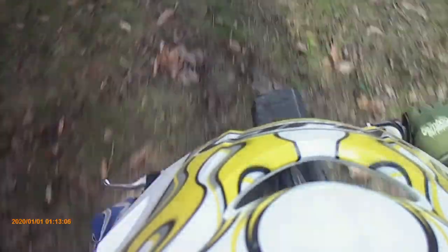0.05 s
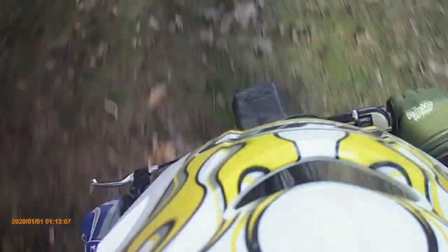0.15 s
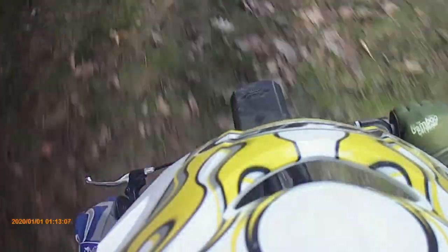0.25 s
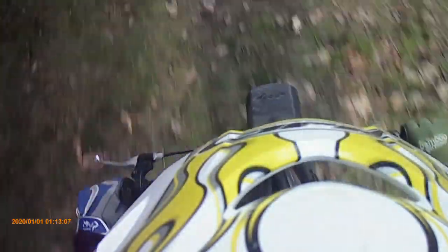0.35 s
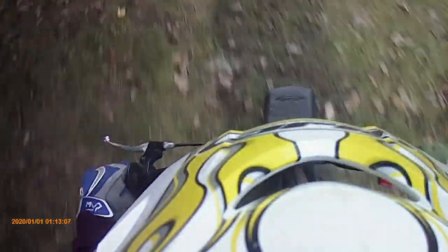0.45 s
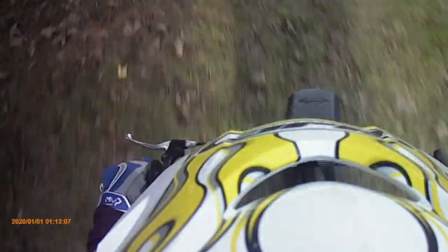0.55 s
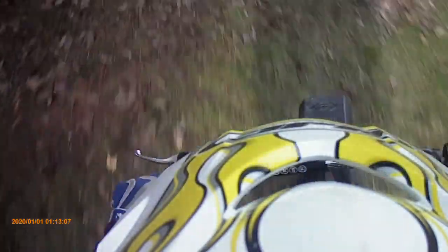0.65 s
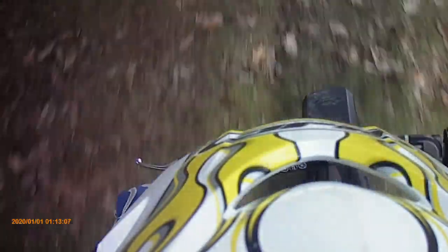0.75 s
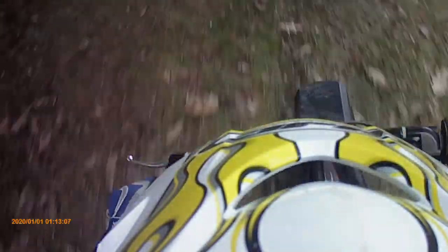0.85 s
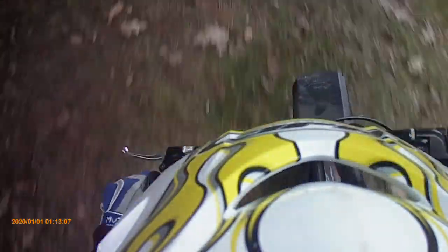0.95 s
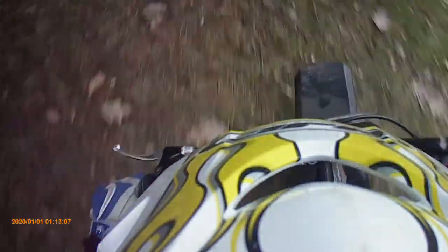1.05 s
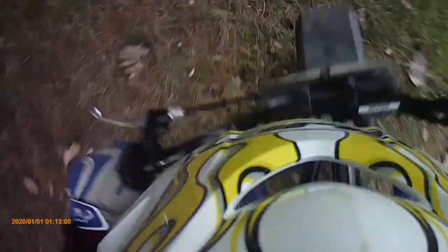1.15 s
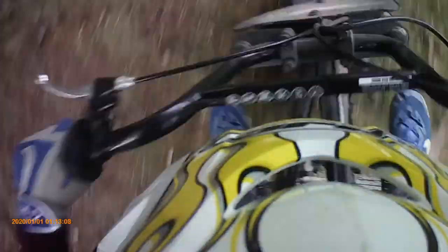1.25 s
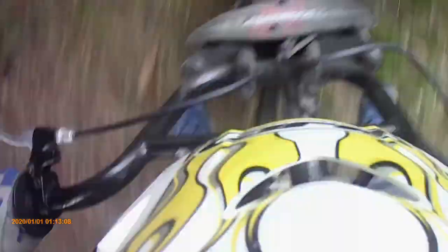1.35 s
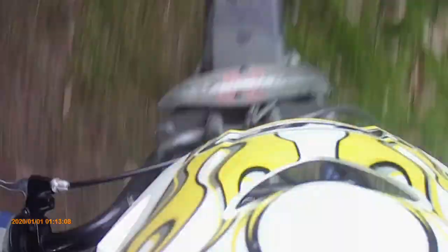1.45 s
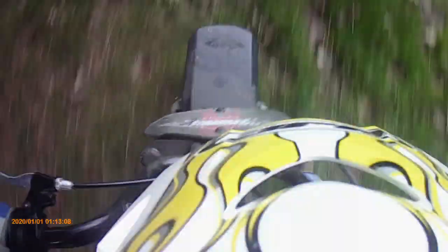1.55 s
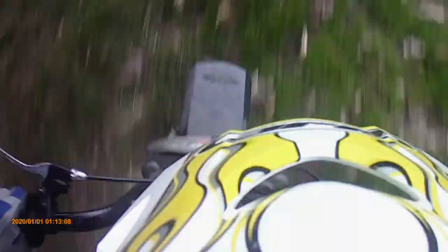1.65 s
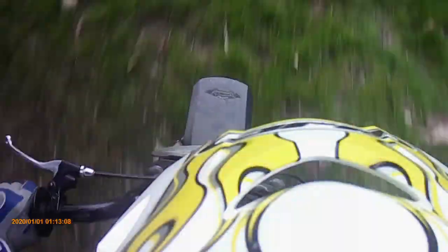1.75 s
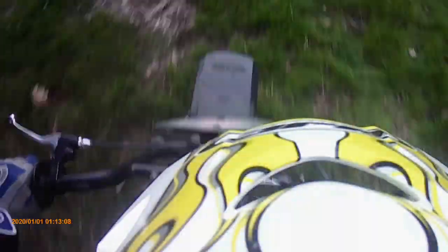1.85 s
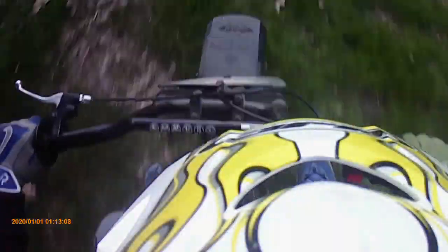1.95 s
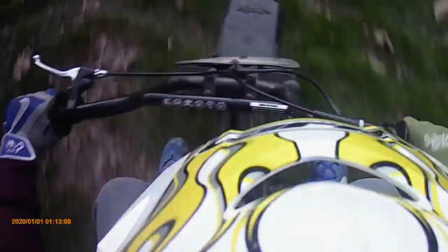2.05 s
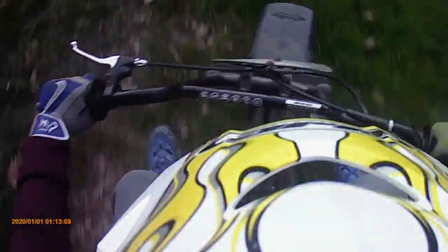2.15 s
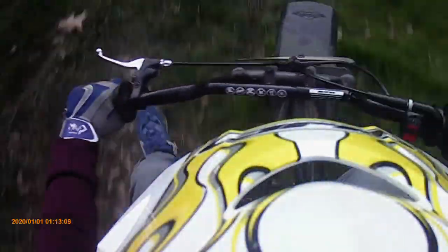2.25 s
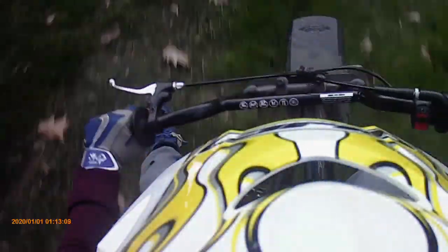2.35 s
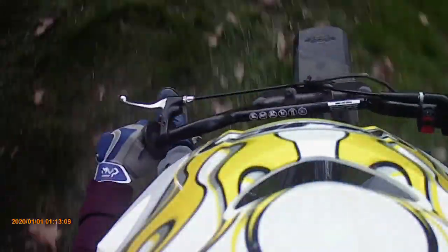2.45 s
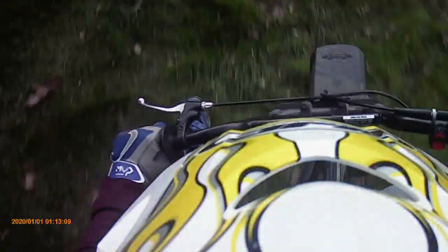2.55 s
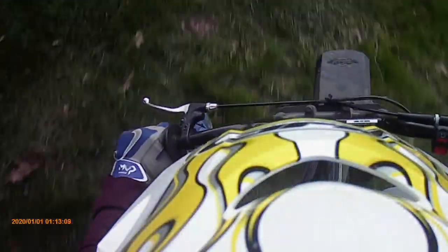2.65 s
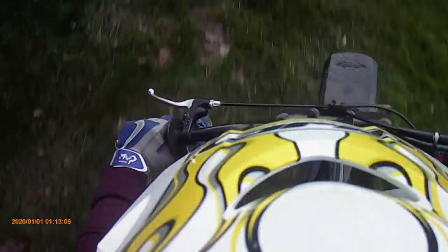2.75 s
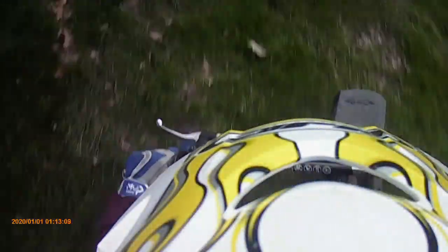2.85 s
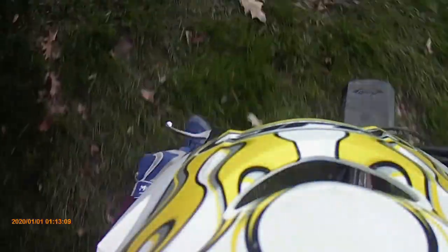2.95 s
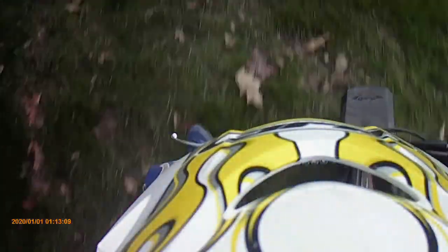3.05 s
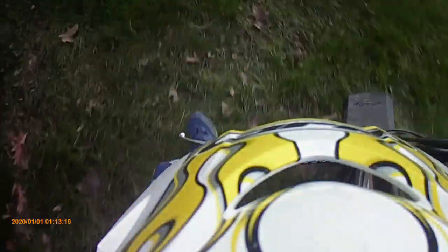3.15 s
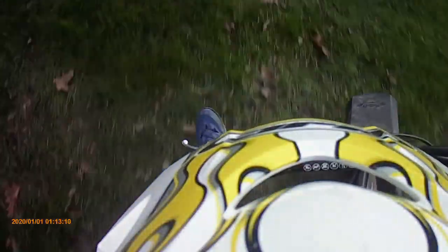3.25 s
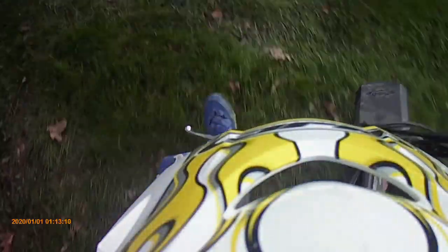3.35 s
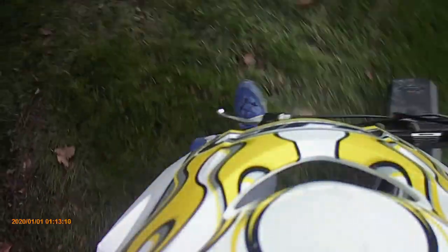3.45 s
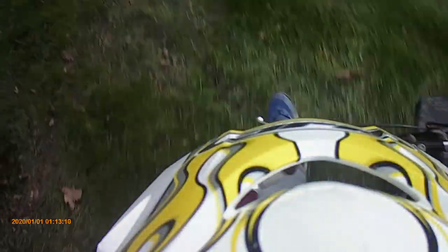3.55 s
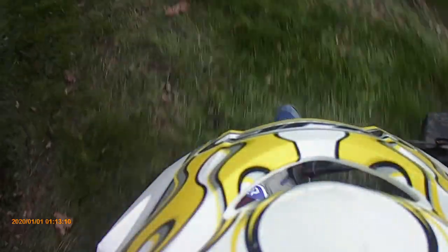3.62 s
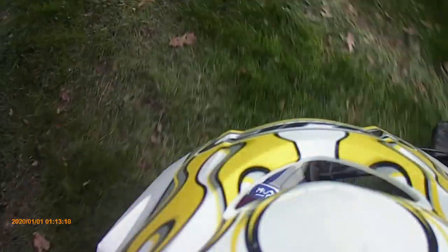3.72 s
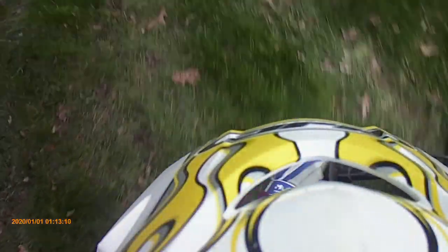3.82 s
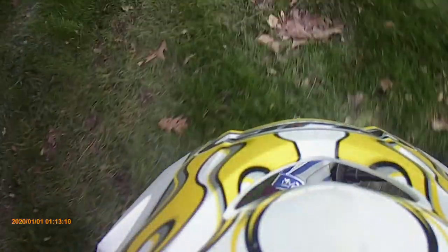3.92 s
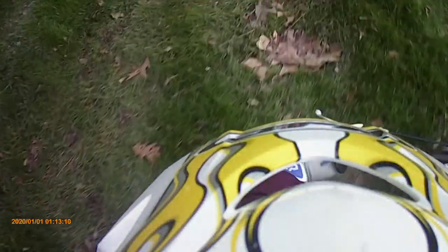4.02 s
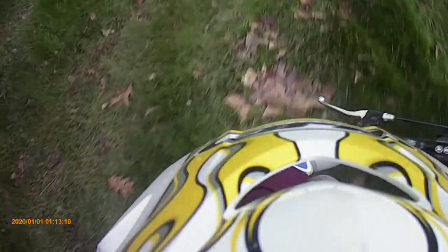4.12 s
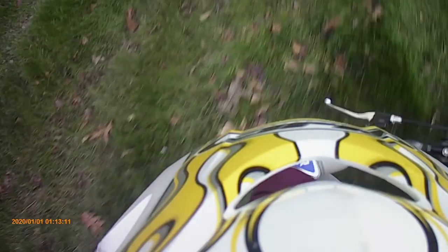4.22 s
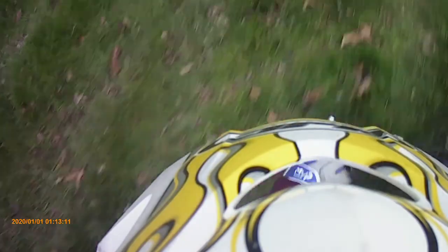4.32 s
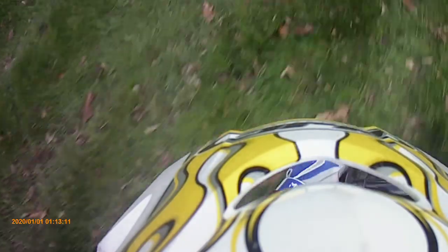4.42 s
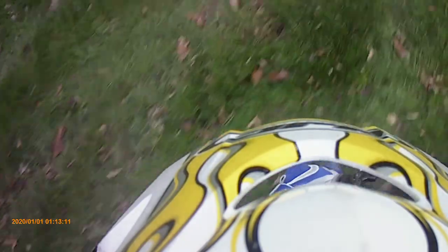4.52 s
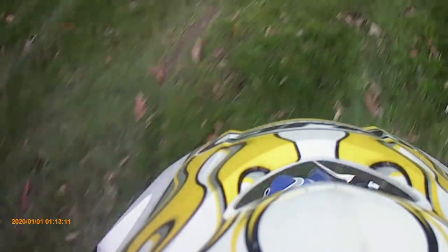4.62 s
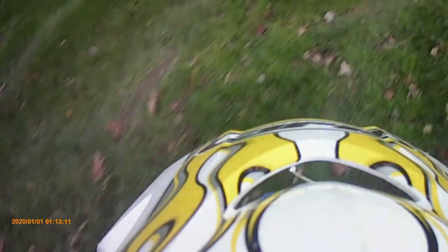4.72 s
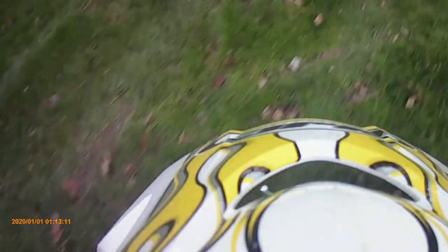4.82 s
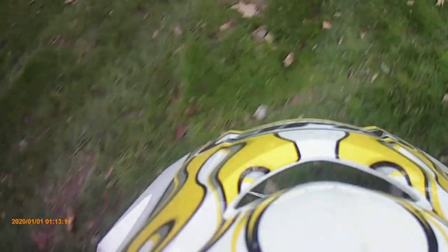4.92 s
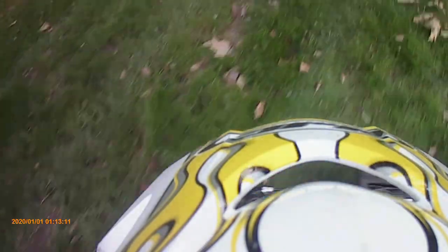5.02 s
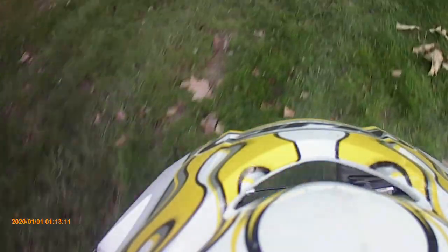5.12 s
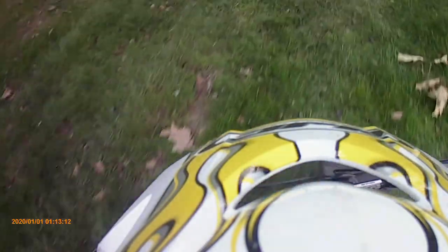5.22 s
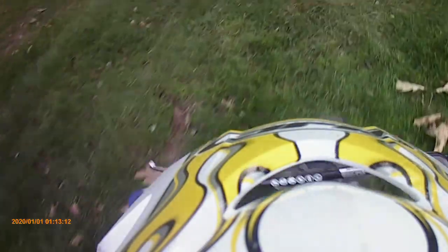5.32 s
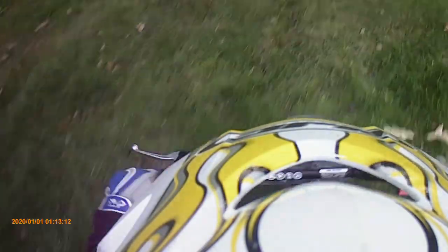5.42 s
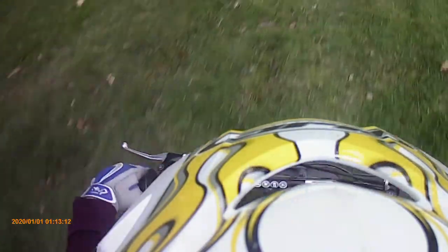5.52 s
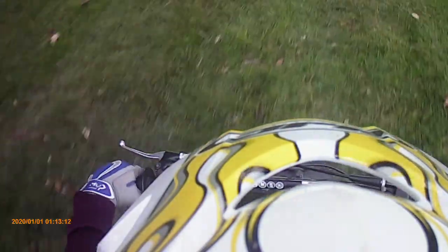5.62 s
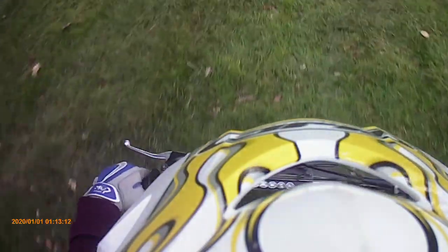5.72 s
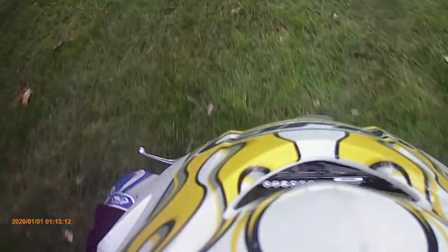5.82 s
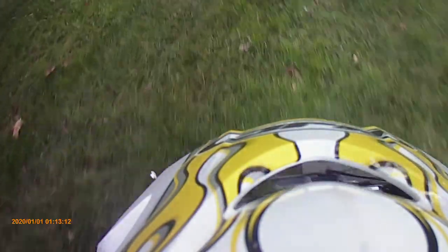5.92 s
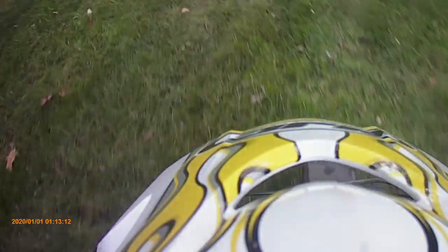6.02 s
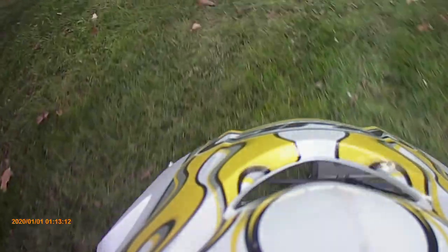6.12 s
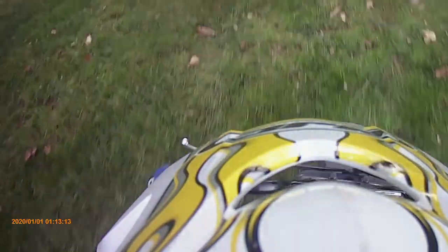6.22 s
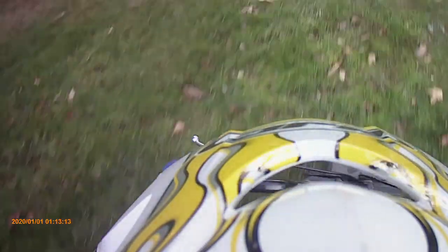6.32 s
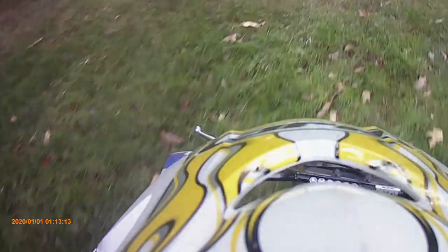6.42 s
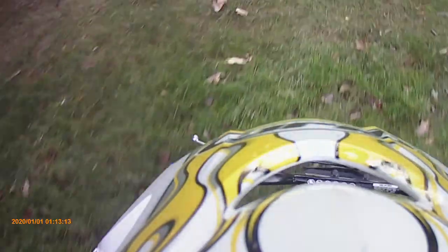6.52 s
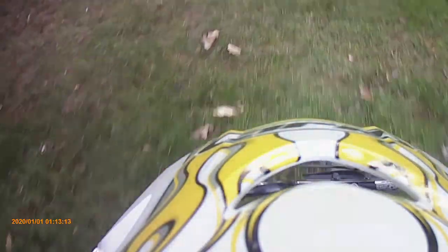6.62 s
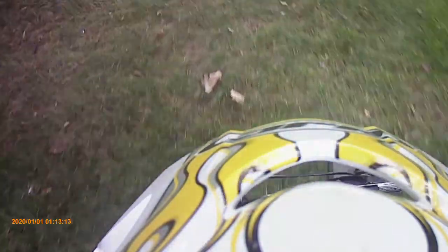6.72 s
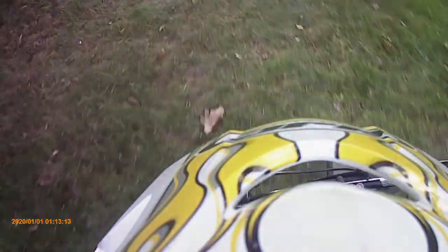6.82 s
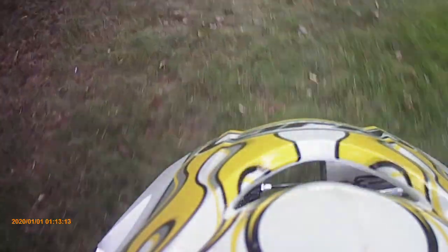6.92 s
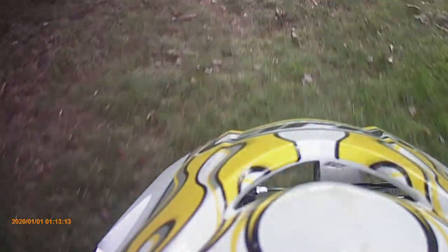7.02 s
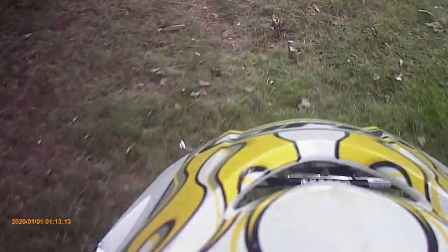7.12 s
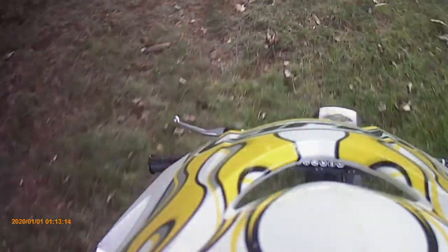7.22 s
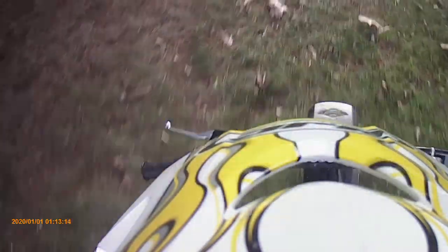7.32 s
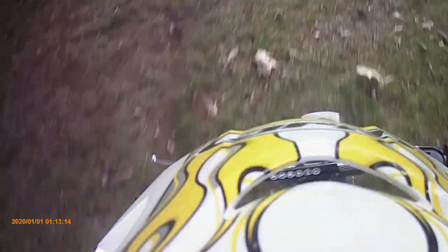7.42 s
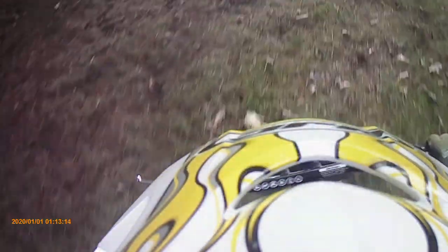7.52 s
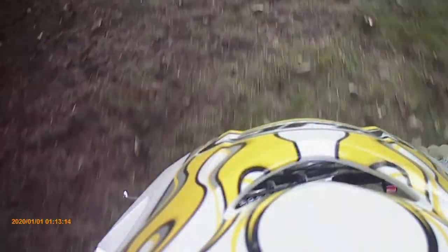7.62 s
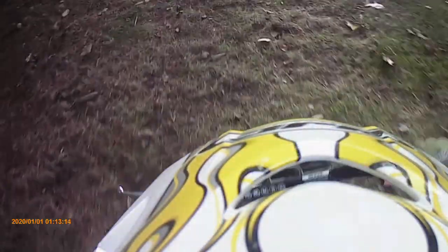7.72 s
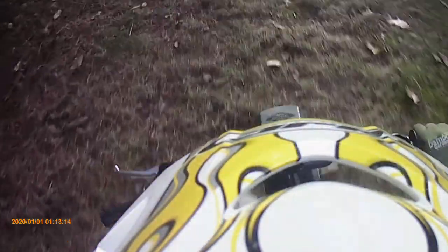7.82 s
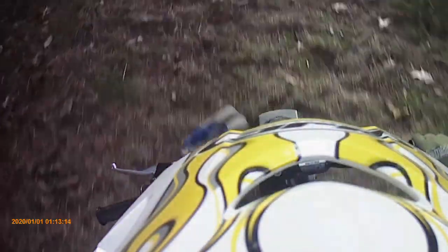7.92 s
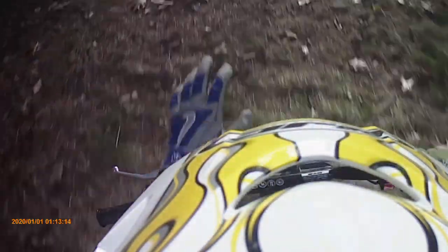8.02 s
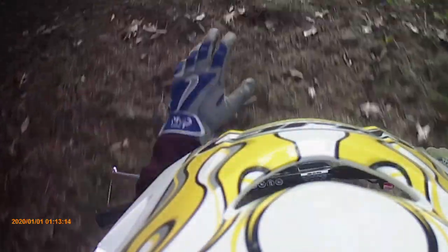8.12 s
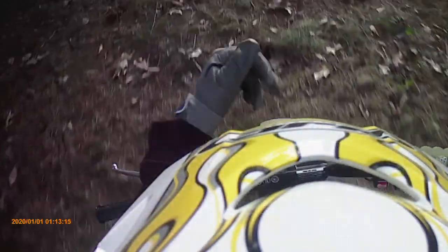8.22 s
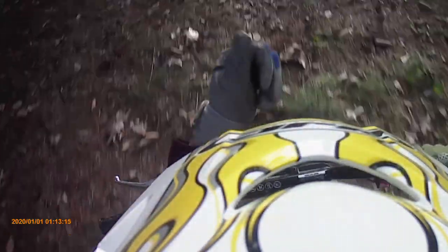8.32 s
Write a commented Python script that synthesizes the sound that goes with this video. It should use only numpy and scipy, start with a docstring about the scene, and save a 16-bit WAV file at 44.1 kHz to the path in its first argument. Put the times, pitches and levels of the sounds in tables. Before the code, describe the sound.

From 0 s a small four-stroke single-cylinder engine runs under load, about twenty uneven firings per second: short metallic cracks around 1.4 to 2 kHz, continuous chain and clutch rattle, hollow exhaust pops and intake tone. Low wind rumble and thin steady hiss lie beneath. The firing grows harder after 1 s. At about 1.28 to 1.38 s a very loud burst of blows, gritty scraping and a tiny squeal hits the plastic camera case, clipping harshly, with a low bounce. Strong knocking continues until about 2.1 s, when the throttle closes; firing fades, pulses slow to about thirteen per second, leaving soft rattle and tappet ticks. Around 3.15 s it reopens, quickens with a brief rattly surge near 3.4 s, then settles into a steady, somewhat quieter chug until 8.4 s. A faint soft jolt falls near 7.7 s. The sound is close, boxy, thin in bass and mono.

```python
"""Over grass, on the move: a small four-stroke single-cylinder bike, heard by a camera in a plastic helmet case.
Each firing sets off resonant noise bursts and rings the engine block; chain and clutch rattle is resonant noise.
Puffs ring the exhaust and intake, tappets tick, and wind and hiss lie beneath; the throttle closes once and reopens.
Jolts bounce the mount; blows, a scrape and a squeal ring the case hard enough to overload the microphone."""
import sys
import numpy as np
from scipy import signal
from scipy.fft import rfft, irfft
from scipy.io import wavfile

SR = 44100
rng = np.random.default_rng(int(sys.argv[2]) if len(sys.argv) > 2 else 0)


def bounce(signal):
    """Save signal as a 16-bit WAV file at the path given by the first command-line argument."""
    frames = np.transpose(np.atleast_2d(signal))
    limited = np.clip(frames, -1, 1)
    pcm = np.round(limited * 32767).astype(np.int16)
    wavfile.write(sys.argv[1], SR, pcm)


N = 368676


def from_db(db):
    """Decibels to gain."""
    return 10 ** (np.asarray(db) / 20)


def rms_one(x):
    """Scale to unit rms."""
    return x / np.sqrt(np.mean(x ** 2) + 1e-20)


def in_time(rows):
    """Interpolate the columns of a (time_s, ..) table at every sample."""
    s, *columns = np.transpose(rows)
    return [np.interp(np.arange(N) / SR, s, column) for column in columns]


def resonate(x, hz, width_hz):
    """One resonance driven by a signal, with gain about 1 on top."""
    r = np.exp(-np.pi * width_hz / SR)
    feedback = [1, -2 * r * np.cos(2 * np.pi * hz / SR), r * r]
    return signal.lfilter(np.array([1, 0, -1]) * (1 - r * r) / 2, feedback, x + 1e-18)


def ring(clicks, hz, width_hz):
    """A unit click sets off a decaying sine of initial height 1; a wider mode dies sooner."""
    r = np.exp(-np.pi * width_hz / SR)
    w = 2 * np.pi * hz / SR
    return signal.lfilter([0, np.sin(w)], [1, -2 * r * np.cos(w), r * r], clicks + 1e-18)


def filtered(x, hz, kind, order=2):
    """Butterworth filter."""
    return signal.sosfilt(signal.butter(order, hz, kind, fs=SR, output="sos"), x)


def drift(hz):
    """Random wandering of unit rms, slower than the given rate."""
    return rms_one(filtered(rng.standard_normal(N + SR), hz, "low")[SR:])


def clicks_at(times, gains):
    """A click train; times outside the scene land on its ends."""
    out = np.zeros(N)
    places = np.round(np.asarray(times) * SR).astype(int)
    np.add.at(out, np.clip(places, 0, N - 1), gains)
    return out


def swell(clicks, rise_s, fall_s):
    """Each click becomes an envelope that rises to its own height and dies away."""
    t = np.arange(SR // 10) / SR
    shape = (1 - np.exp(-t / rise_s)) ** 2 * np.exp(-t / fall_s)
    return signal.oaconvolve(clicks, shape / shape.max())[:N]


def cycle_times(point):
    """Moments when the crank passes a point (0-1) of each four-stroke cycle."""
    # crank position: time_s, engine cycles completed
    crank = [(-0.004, 0), (0.409, 8), (1.018, 20), (1.633, 32), (1.834, 36), (2.041, 40), (2.139, 42),
             (2.25, 44), (2.385, 46), (2.535, 48), (2.687, 50), (3.007, 54), (3.164, 56), (3.279, 58),
             (3.375, 60), (4.926, 92), (6.667, 128), (6.866, 132), (8.381, 163)]
    s, count = np.transpose(crank)
    return np.interp(np.arange(count[-1]) + point, count, s)


def throttled(open_db, shut_db, shut_lag_s, open_lag_s, ease_s):
    """A level that eases to its shut value when the throttle closes and back when it reopens."""
    closes_s, reopens_s = 2.1, 3.15
    t = np.arange(N) / SR
    closing = np.tanh(2 * (t - closes_s - shut_lag_s) / ease_s)
    reopening = np.tanh(2 * (t - reopens_s - open_lag_s) / ease_s)
    shut = (closing - reopening) / 2
    return open_db + (shut_db - open_db) * shut


def engine_body(rattle_db, knock_db):
    """Rattle fills the cycle; each firing adds a burst a few ms long that favours other resonances every time."""
    # resonances of engine and camera case as they reach the microphone:
    # pitch_hz, nominal width_hz, relative rattle_db, relative knock_db
    body = [(308.5, 52, -17, -32.5), (405, 61, -20.5, -14), (602.6, 163, -16, -22.5),
            (875.5, 200, -14, -26.5), (1159.6, 60, -9, -11.5), (1290, 210, -8, -38.5),
            (1411, 84, -2.5, -0.5), (1522, 73, -8, -12.5), (1761, 87, -2, -17), (1875, 74, -3.5, -34.5),
            (1981, 100, -10, -9.5), (2001, 250, -6, -3), (2262, 83, -13, -11.5), (2482, 226, -17, -6.5),
            (2780, 260, -27, -24.5), (3490, 210, -31, -22), (3157, 170, -18, -10), (3836, 170, -20, -8),
            (4335, 240, -27.5, -12), (4700, 280, -29.5, -36.5), (5880, 1100, -26.5, -19.5)]
    rattle_fade_db = 3.5  # the rattle dies down over a cycle until the next valve seats
    fires = cycle_times(0) - .0048
    valves = cycle_times(0) - .012  # a valve seats just ahead of the firing
    uneven = rng.normal(0, 1, (len(fires), len(body) + 2))
    common_db = uneven[:, -2]
    since_valve = np.interp(np.arange(N) / SR, valves, np.arange(len(valves))) % 1  # share of a cycle
    seating = swell(clicks_at(valves, from_db(-13.5 + 1.4 * uneven[:, -1])), rise_s=.00063, fall_s=.008)
    rattle_level_db = rattle_db - 1.0 - rattle_fade_db * since_valve + 1.4 * drift(62.3)
    rattle = from_db(rattle_level_db) * (1 + seating)
    settle = .17 * swell(clicks_at(fires, from_db(common_db)), rise_s=.013, fall_s=.011)
    out = 0
    for k, (hz, width_hz, steady_db, burst_db) in enumerate(body):
        late_s = .0008 * rng.standard_normal(len(fires))
        firing = clicks_at(fires + late_s, from_db(2.6 * uneven[:, k] + common_db))
        burst = swell(firing, rise_s=.001, fall_s=.003) + settle  # the crack, then the parts settle
        # each resonance is applied twice, which keeps the valleys between them dark
        steady, sudden = rng.standard_normal((2, N)) * np.sqrt(SR / width_hz) * from_db(-12.5)
        steady = from_db(steady_db + 1.5 * drift(4)) * rattle * steady
        sudden = from_db(burst_db + knock_db + 18.0) * burst * sudden
        once = resonate(steady, hz, 1.2 * width_hz) + resonate(sudden, hz, 2.05 * width_hz)
        out = out + resonate(once, hz, 1.6 * width_hz)
    return out


def block_strikes(knock_db):
    """Each firing hammers the block's modes with chance strengths and signs; hard firings get a further strike."""
    # modes of the engine block: pitch_hz, width_hz, level_db
    block = [(1200, 100, -12), (1410, 55, -7), (1510, 90, -12), (1800, 80, -10), (1960, 90, -10),
             (2480, 120, -16), (3140, 110, -25), (3840, 100, -22), (4300, 130, -25)]
    # firings that knock harder than their neighbours: time_s, strength_db before the mode levels
    hard_firings = [(0.407, -21), (0.608, -26), (0.656, -21), (0.7585, -19), (1.0142, -17.5), (1.064, -21),
                    (1.1173, -16), (1.2194, -12), (1.4257, -13.5), (1.4679, -15), (1.5262, -16),
                    (1.5762, -21), (1.6291, -16.5), (1.681, -26), (1.78, -20.5), (1.8814, -22),
                    (1.933, -19), (1.984, -16), (2.0285, -16.5), (2.0862, -17.5), (3.2778, -23),
                    (3.3228, -21), (3.3727, -28), (3.4695, -19), (3.5094, -22.5), (3.663, -32),
                    (3.711, -26), (3.7617, -38), (3.908, -30), (4.1495, -29), (4.246, -29), (4.586, -29),
                    (4.6321, -28), (4.9243, -26), (5.1147, -28), (5.453, -24), (5.7944, -21), (5.9388, -21),
                    (6.1799, -25.5), (6.4217, -26), (6.764, -36), (7.1573, -21), (7.8404, -36),
                    (8.1358, -22), (8.2795, -30.5)]
    strike_above_knock_db = 21  # an ordinary firing's strike, over the knock level
    fires = np.clip(cycle_times(0) - .004, 0, None)
    ordinary_db = knock_db[(fires * SR).astype(int)] + strike_above_knock_db
    s, strength_db = np.concatenate([hard_firings, np.transpose([fires, ordinary_db])]).T
    uneven_db = rng.normal(0, 2.5, (len(s), len(block)))
    signs = rng.choice([-1, 1], uneven_db.shape)
    out = 0
    for k, (hz, width_hz, level_db) in enumerate(block):
        gains = signs[:, k] * from_db(strength_db + level_db + uneven_db[:, k])
        rung = ring(clicks_at(s, gains), hz, width_hz)
        out = out + resonate(rung, hz, 5 * width_hz)  # wide, so the start stays quick
    return out


def valve_gear():
    """Tappets stutter on the valve cover twice a cycle whatever the load, so they show faintly when coasting."""
    # valve cover rung by the tappets: pitch_hz, width_hz, level_db
    cover = [(1383, 60, -43), (1713, 80, -43.5), (2272, 57, -45), (3140, 120, -53.5), (3903, 130, -60)]
    times = np.concatenate([cycle_times(0) + .012, cycle_times(.58)])
    second_db = np.repeat([0, -7.0], len(times) // 2)  # the second tick is softer
    out = 0
    for hz, width_hz, level_db in cover:
        for late_s in (0, .003, .007):  # three touches make one stuttering tick
            touches = times + late_s + rng.normal(0, .001, len(times))
            touch_db = level_db + second_db + rng.normal(0, 3.0, len(times))
            rung = ring(clicks_at(touches, from_db(touch_db)), hz, width_hz)
            out = out + resonate(rung, hz, 3 * width_hz)
    return out


def pipe(modes, uneven_db):
    """A clean puff per cycle rings each resonance of the pipe."""
    out = 0
    for hz, width_hz, level_db, point in modes:
        times = cycle_times(point)
        times = times + rng.normal(0, .00015, len(times))
        puff_db = level_db + rng.normal(0, uneven_db, len(times))
        out = out + ring(clicks_at(times, from_db(puff_db)), hz, width_hz)
    return filtered(out, [76, 700], "band")


def exhaust():
    """Puffs from the firings pop in the exhaust pipe, weaker with the throttle shut."""
    # exhaust resonances: pitch_hz, width_hz, relative level_db, point in the cycle where the puff leaves (0-1)
    exhaust_modes = [(108, 34, 14, .763), (164, 42, 7, .827), (390, 90, 10.5, .9)]
    # throttle response: open_db, shut_db, closing lag_s, opening lag_s, easing_s
    exhaust_throttle = (-48.5, -59, .07, -.08, .15)
    return -from_db(throttled(*exhaust_throttle)) * pipe(exhaust_modes, uneven_db=1.5)


def intake():
    """Puffs ring the intake tract as the valves move, weaker with the throttle shut."""
    # intake resonances: pitch_hz, width_hz, relative level_db, point in the cycle of the puff (0-1)
    intake_modes = [(432, 20, 1, .48), (432, 20, 0, .575), (315, 50, 0, .15), (490, 45, -1, .62)]
    # throttle response: open_db, shut_db, closing lag_s, opening lag_s, easing_s
    intake_throttle = (-48, -64, .1, .1, .25)
    return from_db(throttled(*intake_throttle)) * pipe(intake_modes, uneven_db=1.5)


def wind():
    """Low-passed noise rumbles as air and ground under way, with a resonant murmur from the frame."""
    # rumble level around the throttle: open_db, shut_db, closing lag_s, opening lag_s, easing_s
    wind_throttle = (-55, -56, .1, .1, .3)
    air = rng.standard_normal(N)
    rumble = rms_one(filtered(air, 140, "low"))
    murmur = .7 * rms_one(resonate(air, hz=120, width_hz=50))
    return from_db(throttled(*wind_throttle) + 1.5 * drift(6)) * (rumble + murmur)


def hiss():
    """Steady microphone self-noise, flat below the first point of its spectrum."""
    # spectrum of the hiss: pitch_hz, relative level_db per Hz; above 12 kHz it falls away steeply
    hiss_spectrum = [(7500, 3), (11200, 0.5), (12200, -11.5), (12500, -11.5), (16200, -50.5), (22000, -120)]
    hz, level_db = np.transpose(hiss_spectrum)
    bins_hz = np.arange(N // 2 + 1) * SR / N
    gain = from_db(np.interp(np.log(bins_hz + 1), np.log(hz), level_db))
    return from_db(-64) * rms_one(irfft(rfft(rng.standard_normal(N)) * gain, N))


def mount():
    """Soft jolts, low-passed clicks, set camera and mount bouncing at low modes."""
    # jolts of the mount: time_s, level_db before softening
    jolts = [(1.026, -34), (1.292, -6), (1.331, -5), (1.366, -17), (1.395, -19.5), (7.73, -18)]
    # modes of the mount: pitch_hz, width_hz, relative level_db
    mount_modes = [(94, 24, 0), (175, 22, -12), (290, 50, -9)]
    s, level_db = np.transpose(jolts)
    push = filtered(clicks_at(s, from_db(level_db)), 150, "low")
    return sum(from_db(mode_db) * ring(push, hz, width_hz) for hz, width_hz, mode_db in mount_modes)


def scrape_level(contacts):
    """Each contact bites fast, holds and lets go; the loudest one counts (dB)."""
    rise_db_per_s, fall_db_per_s = 5003, 1202.5
    t = np.arange(N) / SR
    levels = []
    for s, hold_s, level_db in contacts:
        bite_db = rise_db_per_s * np.maximum(s - t, 0)
        release_db = fall_db_per_s * np.maximum(t - s - hold_s, 0)
        levels.append(level_db - bite_db - release_db)
    return np.max(levels, axis=0)


def case_knock():
    """Blows and a gritty scrape ring the case modes, with a squeal; bright blows lift the upper modes."""
    # blows on the case: time_s, strength_db, brightness_db, weight of low modes_db, weight of main mode_db
    blows = [(1.278, 7, -9.5, -23, 1.5), (1.284, -1, 10, 0, 1.5), (1.291, 2, -5, -1, 0),
             (1.3, 5.5, 4.5, -2, -13.5), (1.304, -5, 23.5, -4.5, -8.5), (1.312, -4, -4, 2.5, 2.5),
             (1.319, -1.5, 4, -5.5, -5), (1.325, 2, 17, -4.5, -9), (1.328, 5.5, 9.5, -2, -7.5),
             (1.333, -4, -3, 6.5, -7), (1.338, -5.5, 2, -2.5, -6.5), (1.342, -5, 10.5, -11, -8),
             (1.351, -19, -0.5, -6.5, -3), (1.3583, -8, 17, -9, -7.5), (1.367, -18.5, 5, -15, -0.5),
             (1.375, -18.5, -9.5, -12.5, -1.5)]
    # scraping contacts under the blows: start_s, hold_s, relative level_db
    scrape = [(1.275, .002, -14), (1.282, 0.016, -4), (1.308, .02, -4), (1.325, 0.015, -2),
              (1.358, 0.0082, -10.5)]
    # rubbing contact that squeals around the main mode: start_s, hold_s, grip_db (the tone swings twice as far)
    squeal = [(1.279, .015, 2), (1.3125, .004, 0)]
    # modes of the struck case: pitch_hz, nominal width_hz, level_db
    case_modes = [(256, 88, -21.5), (422, 170, -10.5), (624, 340, -10.5), (890, 83, -5), (1272, 170, -1),
                  (1480, 160, -0.5), (1676, 110, 1.5), (1860, 180, -10), (2100, 170, -5.5),
                  (2594, 120, -6.5), (3360, 152, -12), (3984, 140, -9), (4440, 100, -11.5),
                  (4870, 260, -26.5), (5660, 900, -29.5), (7335, 1200, -33), (11300, 2970, -21.5)]
    low_modes_hz, main_mode_hz = 1500, 1670
    bright_hz, contact_hz = 1947, 5780  # pivot of the brightness, softness of the contact
    s, strength_db, bright_db, low_db, main_db = np.transpose(blows)
    grit = from_db(scrape_level(scrape)) * rng.standard_normal(N) * from_db(4.4 * drift(250))
    squeal_hz = main_mode_hz * (1 + .03 * drift(90))
    out = from_db(2 * scrape_level(squeal)) * np.sin(2 * np.pi * np.cumsum(squeal_hz) / SR)
    for hz, width_hz, level_db in case_modes:
        if abs(hz - main_mode_hz) < 100:
            colour_db = main_db
        elif hz < low_modes_hz:
            colour_db = low_db
        else:
            colour_db = bright_db * np.tanh(np.log(hz / bright_hz) * 1.7)
        gains = from_db(strength_db + colour_db + rng.normal(0, 2.5, len(s)))
        struck = ring(filtered(clicks_at(s, gains), contact_hz, "low"), hz, width_hz)
        # the rubbing contact damps the ring, so the mode is wider
        scraped = resonate(grit, hz, 1.38 * width_hz) * np.sqrt(SR / width_hz) * .11
        out = out + from_db(level_db) * (struck + scraped)
    return filtered(out, 190, "high")  # a small case radiates little bass


def scene():
    """Engine, air, mount, case and self-noise summed at the single microphone on the helmet."""
    # riding: time_s, drivetrain rattle_db, combustion knock_db (both relative)
    ride = [(0.0, -30, -49), (0.9, -30.5, -47), (1.2, -27, -45.5), (1.48, -27, -45), (1.78, -30, -45.5),
            (1.99, -28.5, -47.5), (2.14, -30.5, -49), (2.3, -33, -68.5), (2.65, -36.5, -67),
            (3.1, -35, -59), (3.2, -36, -48.5), (3.4, -28.5, -46), (3.6, -33, -48.5), (4.3, -33, -48),
            (4.49, -34.5, -48.5), (5.3, -33, -48.5), (6.6, -32.5, -50), (6.95, -34.5, -51.5),
            (7.3, -31.5, -50), (8.36, -31, -50.5)]
    rattle_db, knock_db = in_time(ride)
    engine = engine_body(rattle_db, knock_db) + block_strikes(knock_db) + valve_gear()
    engine = engine + exhaust() + intake()
    return (engine + wind() + hiss() + mount() + case_knock())[None]


def record(dry):
    """Bass roll-off, a hard overload at full scale, then the top is cut."""
    cutoff_hz = 15560  # from here up at least 40 dB down
    thin = .17 * dry + .83 * filtered(dry, 81, "high", order=6)
    overloaded = np.clip(thin, -1, 1)
    return signal.sosfilt(signal.cheby2(12, 40, cutoff_hz, fs=SR, output="sos"), overloaded)


dry = scene()
out = record(dry)
bounce(out)
```